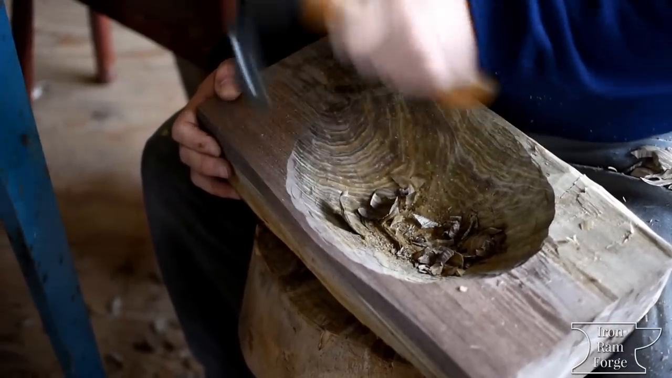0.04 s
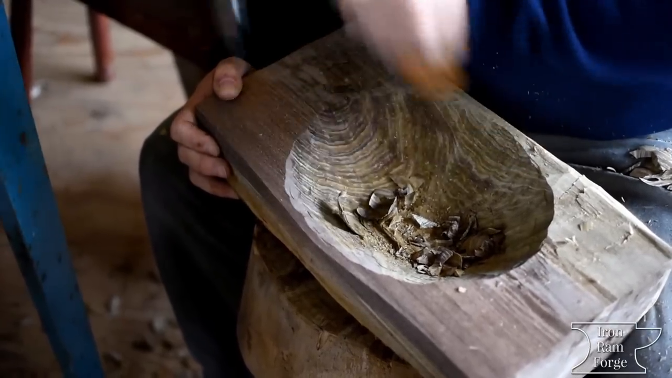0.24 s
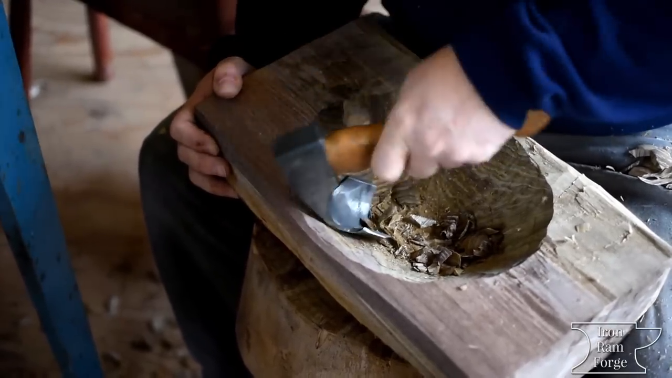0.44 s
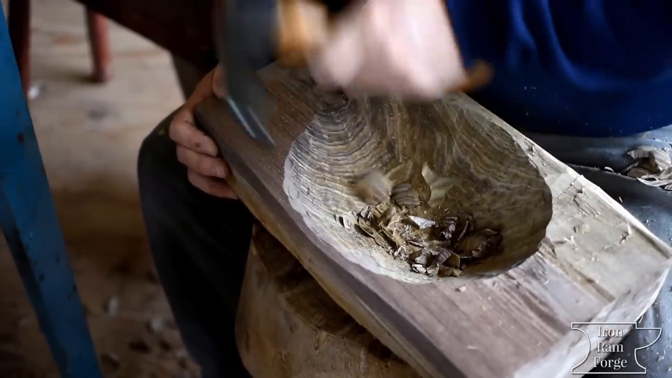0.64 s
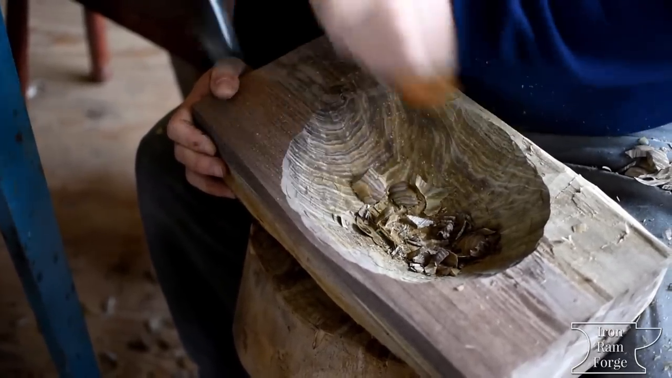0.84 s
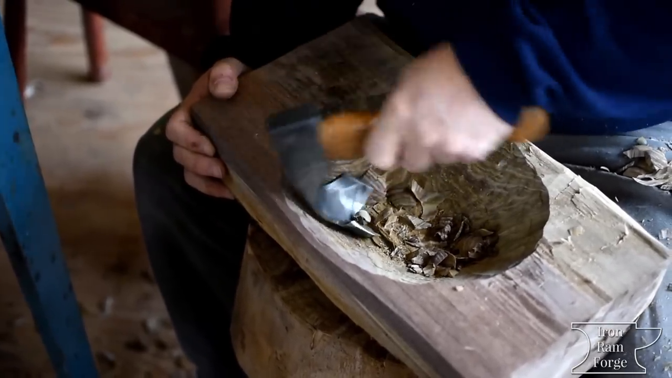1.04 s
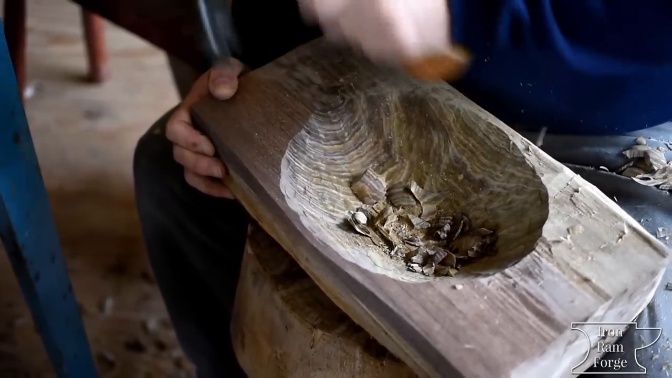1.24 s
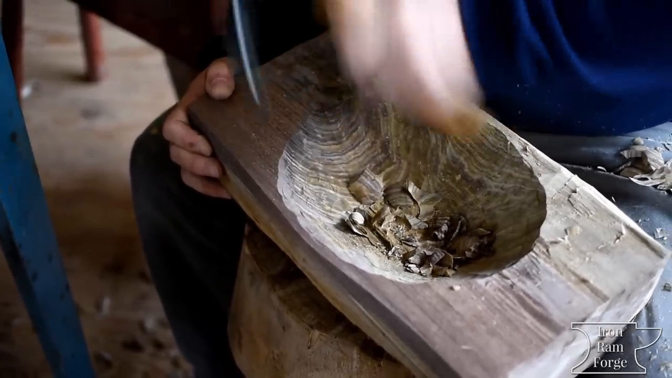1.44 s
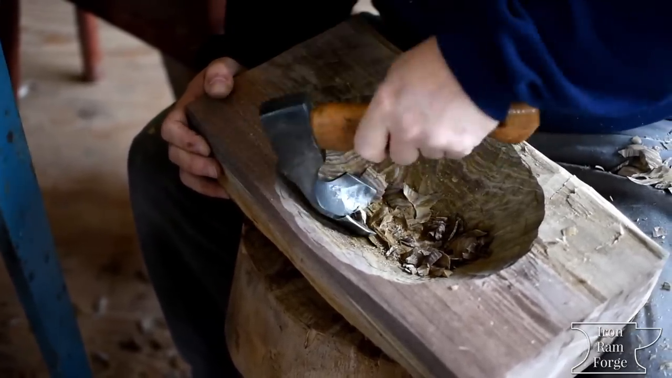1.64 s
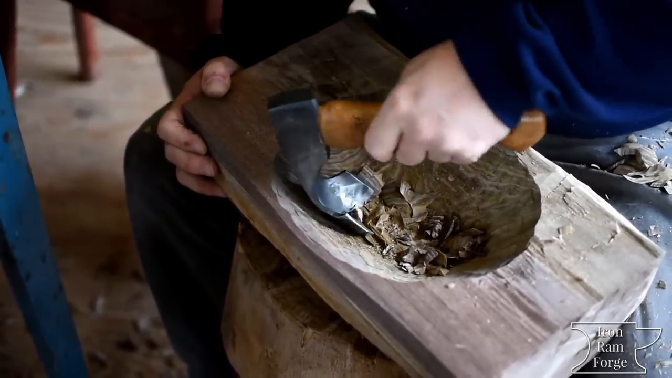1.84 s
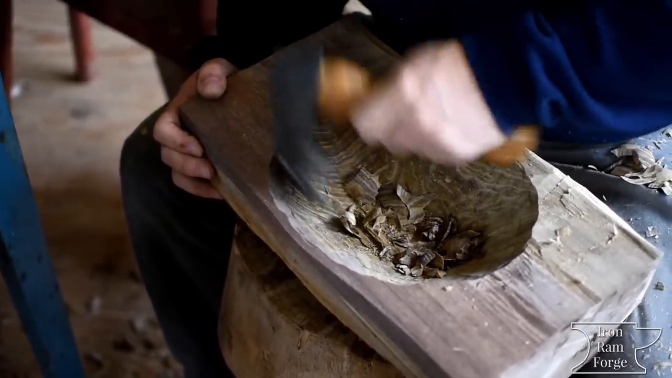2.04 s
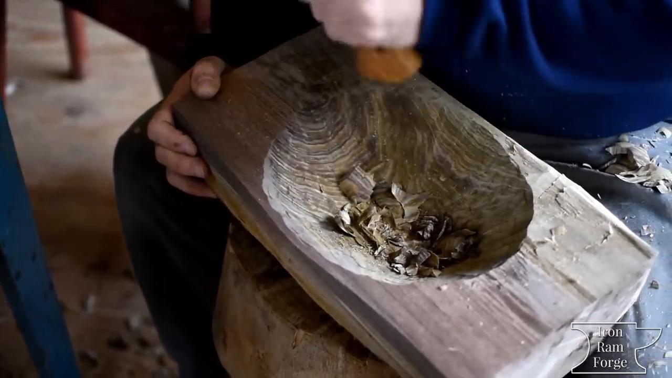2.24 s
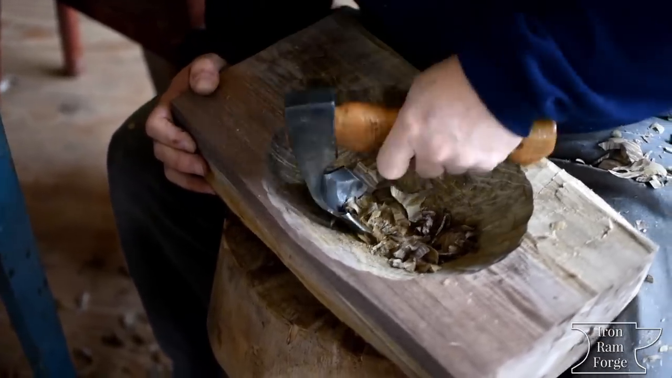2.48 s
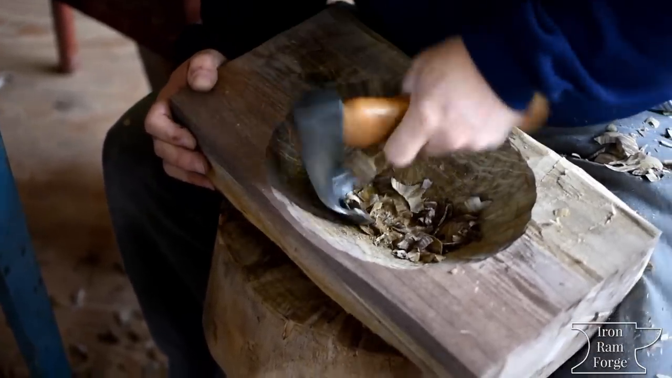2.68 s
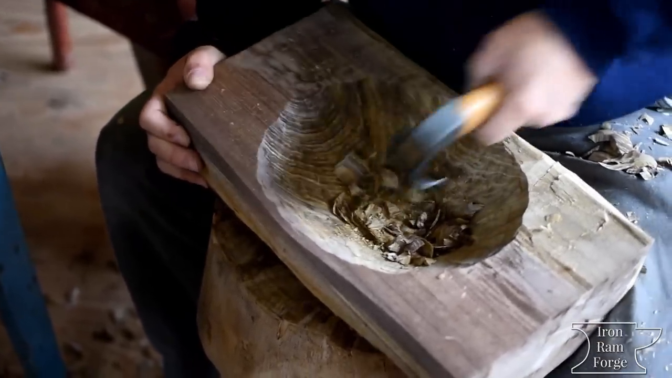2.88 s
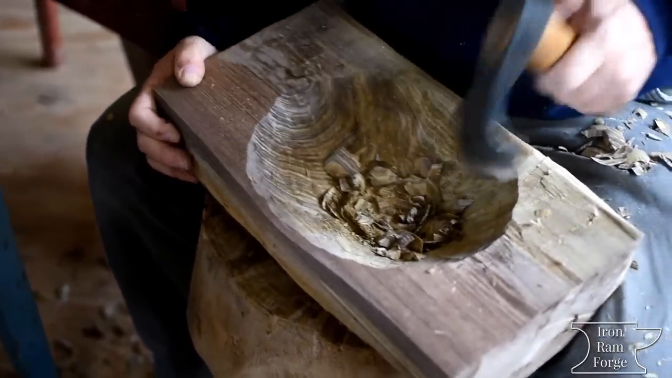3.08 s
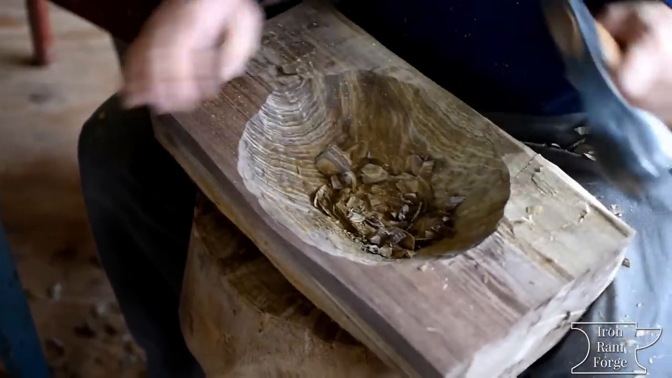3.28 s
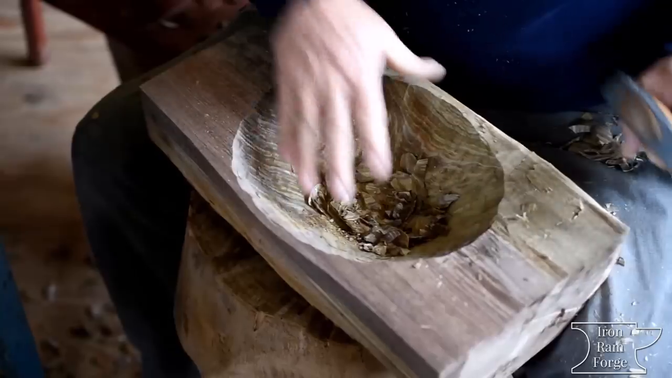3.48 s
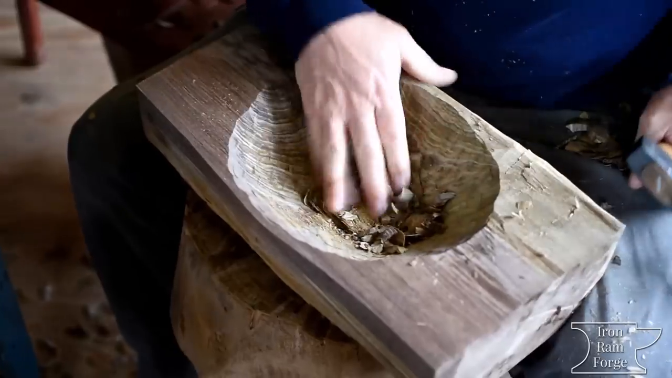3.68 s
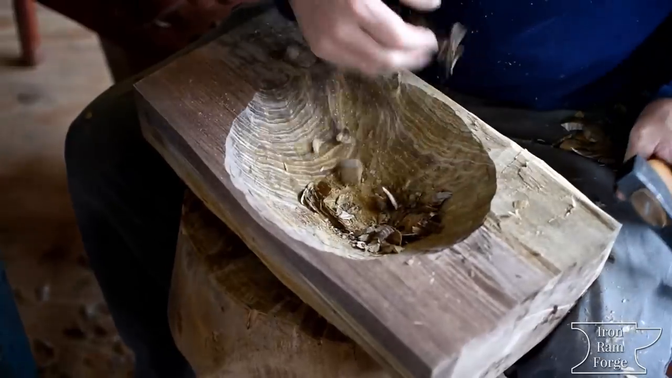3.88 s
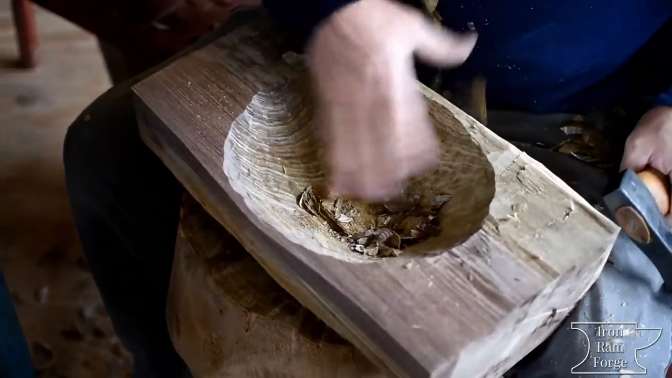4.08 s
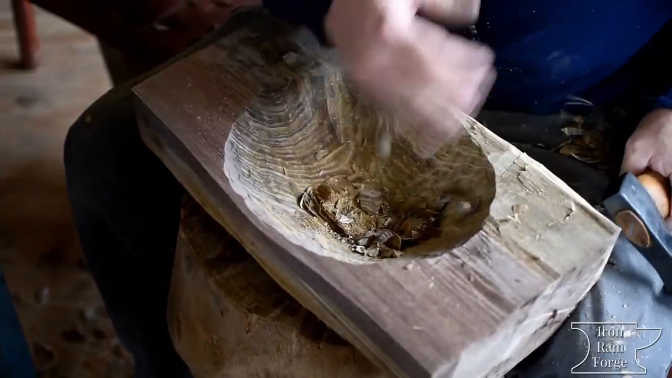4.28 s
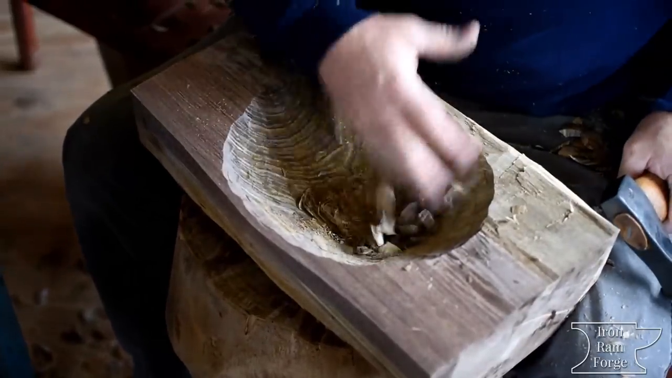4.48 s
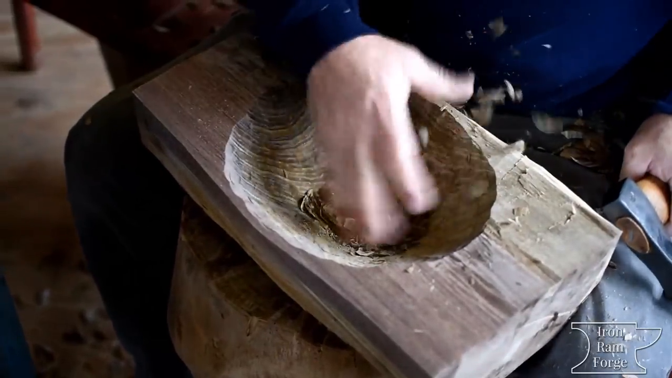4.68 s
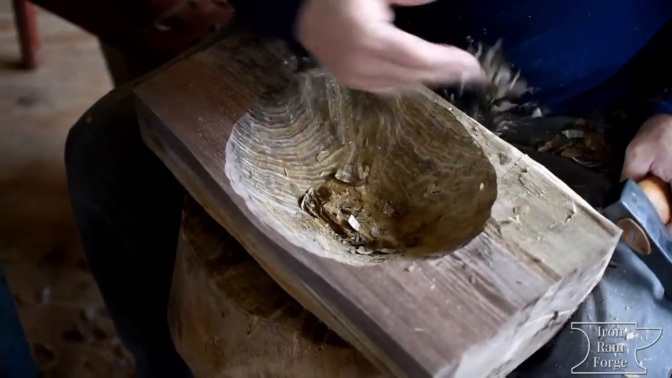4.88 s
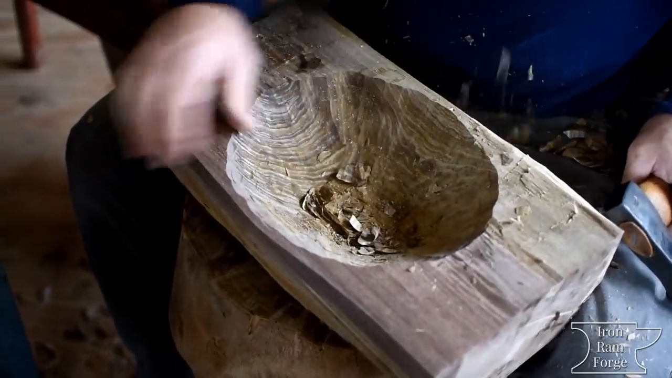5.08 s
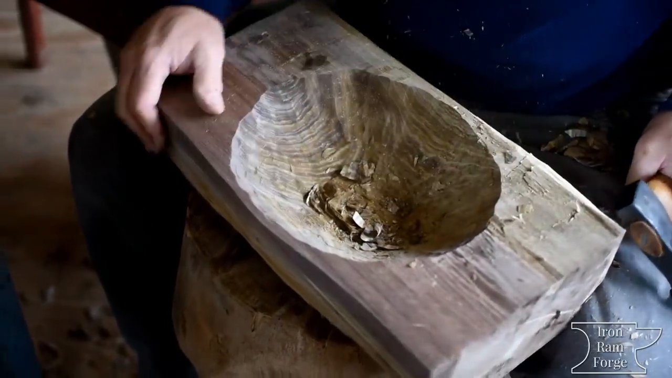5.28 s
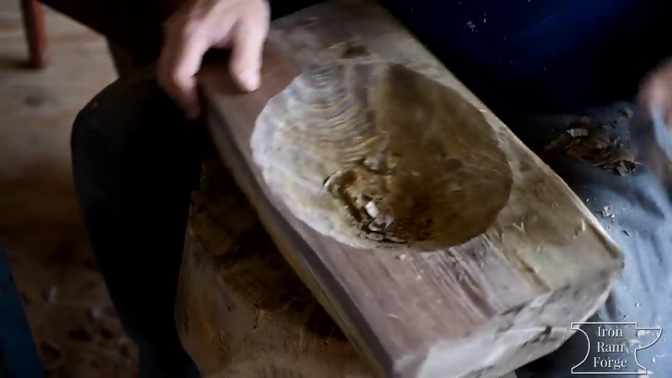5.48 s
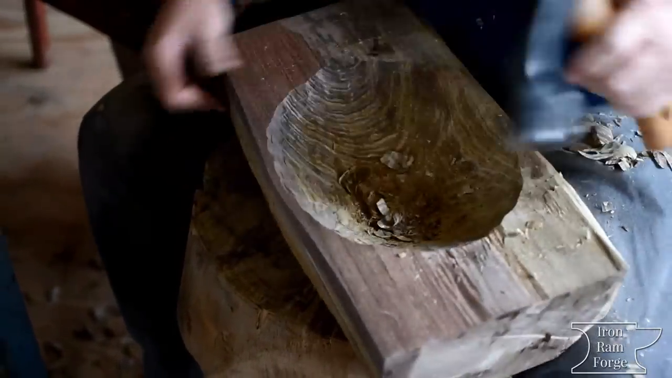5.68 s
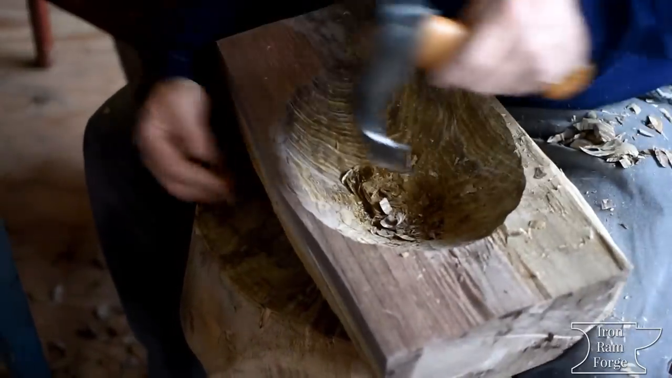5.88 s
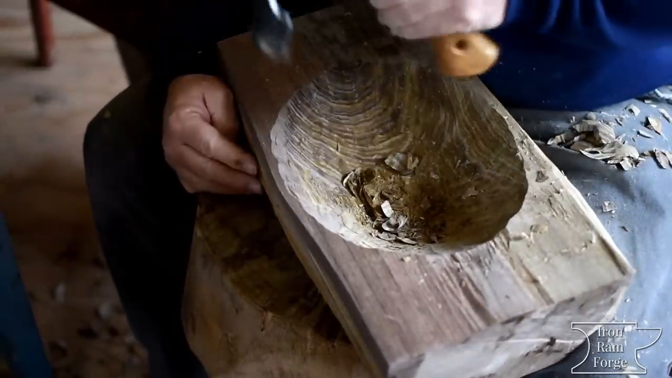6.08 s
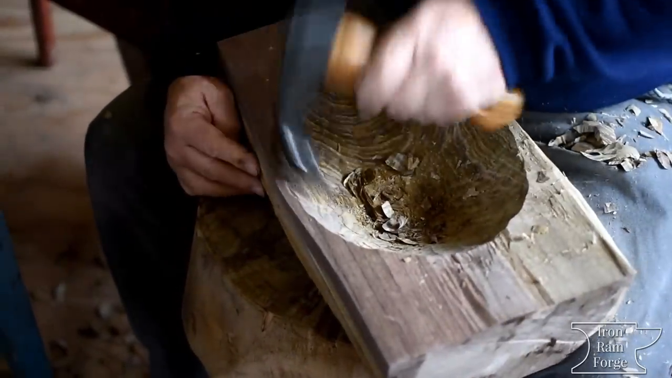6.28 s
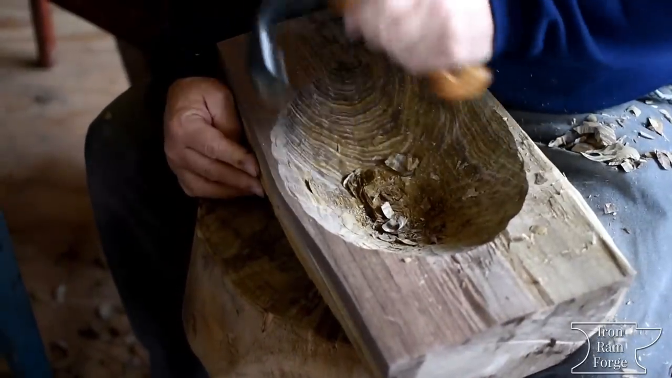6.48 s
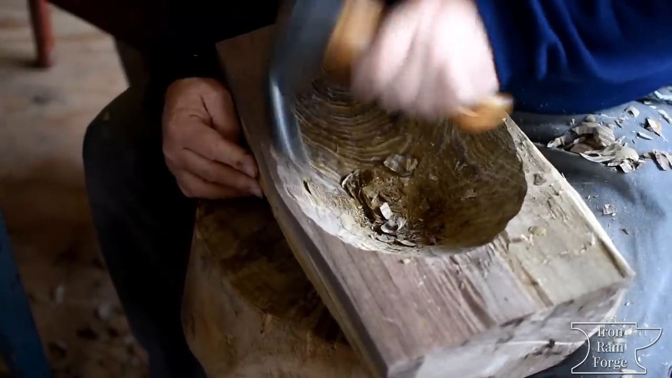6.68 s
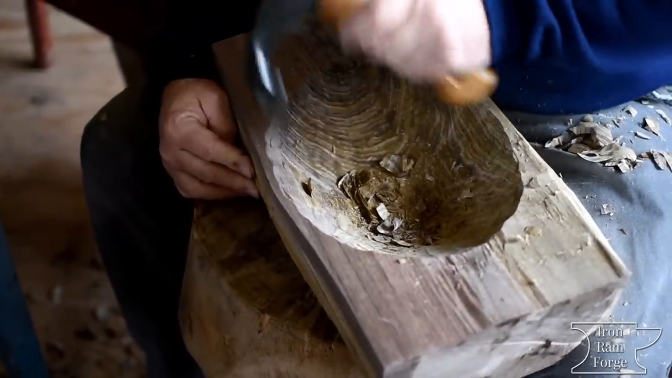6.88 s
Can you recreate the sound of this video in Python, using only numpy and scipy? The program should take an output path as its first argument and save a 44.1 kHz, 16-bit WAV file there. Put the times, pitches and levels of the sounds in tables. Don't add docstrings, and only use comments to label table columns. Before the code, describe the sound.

Close in a workshop, an adze strikes a damp wooden bowl blank four times, each blow a hard hollow knock with tearing fibres and a brief steely ring. A chip is levered out with sharp snaps, a hand brushes loose chips away, the block is dragged round on cloth with small bumps, then two lighter chops land. Low distant rumble lies underneath.

```python
import sys
import numpy as np
from scipy import signal
from scipy.fft import rfft, irfft, next_fast_len
from scipy.io import wavfile
from scipy.ndimage import uniform_filter1d

SR = 44100
rng = np.random.default_rng(int(sys.argv[2]) if len(sys.argv) > 2 else 0)


def volts(x):
    e = np.asarray(x, float) / 20
    return 10 ** e


def waveform_to_disk(signal):
    frames = np.transpose(np.atleast_2d(signal))
    scaled = np.clip(frames, -1, 1) * 32767
    samples = np.round(scaled).astype(np.int16)
    wavfile.write(sys.argv[1], SR, samples)


N = 305613
LEAD = SR // 2
M = N + LEAD

# (frequency [Hz], t60 [s], level for each of the six blows [dB] x 6, level when rubbed [dB])
LOWER = [(63.5, 0.6, -12, -9.5, -33, -21, -4.5, -1, 4), (106, 0.088, -43, -9, -2, -24, -31, -30, 7.5),
         (153.6, 0.07, 6.5, -1.5, -23, -8.5, 5, 9, 6), (172.5, 0.026, 4, -2, 3, -18, 1, 11, -25),
         (239.8, 0.087, -3, 3, -7.5, 0, -3, -1.5, 1), (295, 0.07, -7.5, -11, -9.5, -3.5, -5, -10, -11),
         (408, 0.025, -7.5, -26, -6, -29, -9, -2, -13)]
WALLS = [(419, 0.021, 3, 5, -10, 2, -2, 5.5, -23), (538, 0.036, 8, 0.5, 8.5, -23, -12, 2, -4),
         (584, 0.014, 11, 8, 12, 10, 6.5, 3, 0), (652, 0.032, -8.5, -26, -7.5, 7, 1.5, 2.5, -30),
         (687, 0.019, -28.5, -7.5, -8.5, 6, 2.5, -2, -28),
         (849, 0.038, -3.5, -3.5, -16.5, 4, -1, -1, -15.5), (915, 0.16, 3, -9.5, 3.5, 5, -32, -21.5, -22),
         (926.5, 0.12, -2, 6, 2, -18, -21, -25, -1), (975.3, 0.11, -14.5, 10.5, -1, -8, 9, -2, -13),
         (958, 0.031, 9, -20, 7.5, 6, 10, 1.5, -5), (1200, 0.00616, -23.5, -12, -24, 9, -21, 5, -38.5),
         (1500, 0.011, 5.5, 3.5, 9, 11.5, -14, -3, -15), (1448, 0.029, -1, -1.5, 7.5, 10.5, -20, -2.5, 1.5),
         (1601, 0.047, -15, -3, -40, -39.5, 1.5, 0.5, 6.5)]
HEAD = [(1910, 0.025, -35, -24, -9, -7.5, -26, -11, -38), (2070, 0.03, -3, -25, -8, -5, -0.5, -2.5, -2.5),
        (2203, 0.024, -30, -32, -22, -7.5, -5, -7, -29), (2440, 0.03, -22, -10, -21, -10, -25, -29, -39),
        (2680, 0.016, -25, -14, -22, -4, -5.5, -8, -41), (2980, 0.091, -44, -20, -23, -24, -7.5, -4.5, -13),
        (3125, 0.023, -11, -35, -14, -19, -26, -10, -15),
        (3150, 0.045, -37.5, -18, -31, -19, -28, -34, -40.5),
        (3580, 0.037, -11, -34, -43, -35, -14, -7, -27.5), (4570, 0.013, -41, -32.5, -21, -11, -8, -4, -31),
        (4755, 0.09, -11, -20, -37, -22.5, -28, -5.5, -38),
        (4763, 0.13, -28, -12, -20, -39, -19.5, -45, -43.5),
        (7090, 0.035, -28, -29.5, -16, -32.5, -15, -32, -44),
        (10120, 0.1, -25.5, -36, -36, -36, -9, -0.5, -40.5)]
UPPER = [(hz, min(t60, 0.08), *db) for hz, t60, *db in WALLS]
UPPER += [(hz, min(t60, 0.055), *db) for hz, t60, *db in HEAD]
RUBBED = 8


def at_hz(points, hz):
    points = np.array(points)
    return np.interp(np.log(hz + 1), np.log(points[:, 0]), points[:, 1])


def colour(x, spectrum):
    size = next_fast_len(len(x))
    gain = volts(at_hz(spectrum, np.fft.rfftfreq(size, 1 / SR)))
    y = irfft(rfft(x, size) * gain, size)[:len(x)]
    return y / np.sqrt(np.mean(y ** 2))


def butter(x, hz, kind, order=2):
    sos = signal.butter(order, np.clip(hz, 10, .45 * SR), kind, fs=SR, output="sos")
    return signal.sosfilt(sos, x)


def drift(rate_hz):
    slow = butter(rng.standard_normal(M // 50 + 2), rate_hz * 50, "low")
    return np.interp(np.arange(M) / 50, np.arange(len(slow)), slow / slow.std())


def rocking():
    # (time [s], frequency [Hz], level [dB], half width [s])
    rocks = [(0.014, 190, -31, 0.017), (0.0205, 65, -28, 0.046), (4.132, 620, -37, .002),
             (2.92, 557, -35.5, 0.0084), (2.469, 118, -23, 0.0075), (2.751, 148, -21, 0.026),
             (2.77, 130, -18, 0.012), (4.209, 480, -26.5, 0.0011)]
    t = (np.arange(M) - LEAD) / SR
    out = np.zeros(M)
    for s, hz, db, half_s in rocks:
        swell = np.exp(-np.abs(t - s) / half_s)
        out += np.sqrt(2) * volts(db) * swell * np.sin(2 * np.pi * hz * (t - s))
    return out


def drone(rows, waver_db):
    t, out = (np.arange(M) - LEAD) / SR, 0
    for s, length_s, hz, level_db, fade_db in rows:
        outside_s = np.maximum(s - t, 0) + np.maximum(t - s - length_s, 0)
        gain = volts(level_db - fade_db * np.maximum(t - s, 0) - 470 * outside_s)
        out = out + gain * np.sin(2 * np.pi * hz * t)
    return np.sqrt(2) * volts(waver_db * drift(25.9)) * out


def background():
    # (time [s], level [dB])
    rumble_levels = [(0.0, -43), (2.2, -43.5), (3.3, -45), (4.6, -48.5), (5.3, -47.5), (6.93, -46)]
    # (frequency [Hz], density [dB per Hz])
    rumble_colour = [(12, -18.5), (20, -4.5), (81, -2.5), (120, -3), (226, -12), (289, -9), (342, -35),
                     (387, -15), (425, -24), (503, -25), (800, -28), (1040, -39.5), (1760, -120)]
    # (time of the jolt [s], peak [dB])
    shudders = [(-.12, -42.5), (.357, -36), (.96, -36.5), (1.533, -48), (2.447, -33), (2.62, -30.5),
                (4.08, -55), (6.338, -58), (6.747, -26)]
    # (time [s], length [s], frequency [Hz], level [dB], fade [dB per s])
    low_drones = [
        (1.72, 0.82, 119, -37, 26.5),
        (2.84, 1.56, 119.7, -38.5, 12.5),
    ]
    high_drones = [
        (5.15, 0.32, 275, -54.5, 27),
        (5.59, 0.69, 288.6, -47, 14),
    ]
    # (frequency [Hz], density [dB per Hz])
    hiss_colour = [(180, -13), (300, 7), (440, -6.5), (946, -10.5), (1060, -10), (3030, -13),
                   (11100, -22.5), (13100, -28), (14200, -29.5), (16000, -66.5)]
    # (frequency [Hz], side re mid [dB])
    hiss_side = [(60, -62), (110, -71.5), (200, -58), (380, -38.5), (700, -23.5), (1290, -14),
                 (2380, -11.5), (4400, -19), (8120, -18), (15000, -7.5)]
    hiss_db, shudder_s = -53.5, 0.06
    t = (np.arange(M) - LEAD) / SR
    gain = volts(np.interp(t, *np.transpose(rumble_levels)))
    for s, peak_db in shudders:
        late = np.maximum(t - s, 0) / shudder_s
        gain += volts(peak_db) * (late / 2) ** 2 * np.exp(2 - late)
    rumble = colour(rng.standard_normal(M), rumble_colour + [(1600, -83.0)])
    rumble = gain * volts(2.83 * drift(9.6)) * rumble
    mid_hiss = volts(hiss_db) * colour(rng.standard_normal(M), [(150, -26.0)] + hiss_colour)
    side_colour = [(hz, db + at_hz(hiss_side, hz)) for hz, db in hiss_colour]
    side_hiss = volts(hiss_db - 5.5) * colour(rng.standard_normal(M), [(150, -90.0)] + side_colour)
    engines = drone(low_drones, waver_db=3.0) + drone(high_drones, waver_db=1.5)
    return np.array([mid_hiss + rumble + rocking() + engines, side_hiss])


def workshop(x):
    # (frequency [Hz], t60 [s], level [dB], side re mid [dB])
    room = [(56.7, 0.7, -4.5, -77), (119, 0.58, 0.5, -61), (262, 0.42, -3.5, -59), (580, 0.41, -8, -97),
            (964, 0.4, -8.5, -41), (2300, 0.41, -9, -13), (3700, 0.36, -6, -13), (7360, 0.32, -13.5, -4.5),
            (14000, 0.14, -37.5, 24.5)]
    even_hz = 30
    t = np.arange(SR) / SR
    white, tails = rng.standard_normal((2, 2, SR)), 0
    gap = np.clip((t - .003) / 0.0096, 0, 1)
    for k, (hz, t60, level_db, side_db) in enumerate(room):
        lines = rfft(white[k % 2] * volts(-60 * t / t60) * gap)
        local_power = uniform_filter1d(np.abs(lines) ** 2, even_hz)
        even = irfft(lines / np.sqrt(local_power), SR) * np.sqrt(SR)
        octave = [hz / np.sqrt(2), hz * np.sqrt(2)]
        band = butter(even * (gap > 0) * (t < .8), octave, "band") / np.sqrt(SR)
        tails = tails + band * volts([[level_db], [level_db + side_db]])
    size = next_fast_len(M + SR)
    return irfft(rfft(x, size) * rfft(tails, size), size)[:, :M]


def flutter():
    # (time of the blow [s], frequency [Hz], level [dB])
    returns = [
        (.3567, 925, -22.5),
        (.96, 960, -21.5),
        (1.5325, 950, -24),
        (2.4472, 923, -28.5),
    ]
    delay_s, hold_s, fade_s = .133, .025, 0.013
    out, t = np.zeros(M), np.arange(SR // 4) / SR
    shape = (1 - np.exp(-t / 0.0025)) * np.exp(-np.maximum(t - hold_s, 0) / fade_s)
    for s, hz, db in returns:
        i = round((s + delay_s) * SR) + LEAD
        out[i:i + len(t)] += volts(db) * shape * np.sin(2 * np.pi * hz * t)
    return out


def singing():
    # (time [s], frequency [Hz], rms level [dB], t60 [s])
    linger = [(.385, 4730, -32, .45), (.97, 4820, -40, .4), (1.55, 3130, -35, 0.39),
              (1.56, 4900, -48, 0.36), (2.46, 2730, -30, .45), (2.9, 4570, -48, 0.32),
              (2.884, 2170, -28, 0.11), (3.553, 3060, -46, 0.15), (3.553, 3700, -54, .12)]
    width_hz = 90
    out, t = np.zeros(M + SR), np.arange(SR // 2) / SR
    for s, hz, db, t60 in linger:
        white = rng.standard_normal(len(t))
        line = butter(white, [hz - width_hz / 2, hz + width_hz / 2], "band")
        i = round(s * SR) + LEAD
        out[i:i + len(t)] += volts(db - 60 * t / t60) * line / line.std()
    return out[:M]


def ring(force, hz, t60):
    r, w = volts(-60 / (t60 * SR)), 2 * np.pi * hz / SR
    return signal.lfilter([0, np.sin(w)], [1, -2 * r * np.cos(w), r * r], force + 1e-18)


def sound_of(modes, column, force):
    return sum((-1) ** k * volts(m[column]) * ring(force, m[0], m[1]) for k, m in enumerate(modes))


def block(upper_force, low_force, column):
    out, driven = np.zeros(len(upper_force)), np.flatnonzero(upper_force)
    span = slice(driven[0], driven[-1] + SR // 2)
    out[span] = sound_of(UPPER, column, upper_force[span]) + sound_of(LOWER, column, low_force[span])
    return out


def through_block(ringing, thud):
    # (time [s], place [0 floor of the hollow to 1 rim])
    touch_place = [(0.0, 0.15), (2.75, 0.091), (2.95, 0.17), (3.3, 0.08), (3.62, 0.083), (3.72, 0.71),
                   (3.84, 0.51), (3.87, 0.74), (4.13, 0.37), (4.3, 0.37), (4.48, 0.46), (4.53, 0.74),
                   (4.56, 0.093), (4.75, .9), (4.78, 0.36), (4.85, .6), (5.2, 0.44), (6.93, .5)]
    # (frequency [Hz], level re floor [dB])
    rim_tilt = [(500, 2), (940, -5.5), (1300, 0), (1450, 9), (1600, -1), (2060, 0), (3000, -9), (5000, -4)]
    click = np.eye(1, SR // 2)[0]
    upper_gain = np.sqrt(np.sum(sound_of(UPPER, RUBBED, click) ** 2))
    low_gain = np.sqrt(np.sum(sound_of(LOWER, RUBBED, click) ** 2))
    t = (np.arange(M) - LEAD) / SR
    share = np.clip(np.interp(t, *np.transpose(touch_place)), 0, 1)
    rim_modes = [(m[0], m[1], m[RUBBED] + at_hz(rim_tilt, m[0])) for m in UPPER]
    rim = sound_of(rim_modes, column=2, force=share * ringing / upper_gain)
    return rim + block((1 - share) * ringing / upper_gain, thud / low_gain, column=RUBBED)


def grit(per_s, spread_db, smooth):
    slips = (rng.random(M) < per_s / SR) * volts(spread_db * np.minimum(rng.exponential(1, M), 4))
    slips = slips * rng.choice([-1, 1], M)
    force = slips / slips.std() + smooth * rng.standard_normal(M)
    return force / force.std()


def strokes(rows, lift_db_per_s):
    touch_s, lands_db = 0.00485, -10
    settle_db, ring_settle_db, settle_db_per_s = -37.5, -47.5, 97
    first, second = np.zeros((2, M + SR))
    t = np.arange(SR) / SR - touch_s
    for s, swell_s, hold_s, level_db, second_db in rows:
        swell_s = max(swell_s, 1e-3)
        after = np.maximum(t - swell_s - hold_s, 0)
        rise = volts(np.interp(t, [-touch_s, 0, swell_s], [lands_db - 11.0, lands_db, 0]))
        lift = volts(level_db) * rise * volts(-lift_db_per_s * after)
        settle = volts(level_db) * rise * volts(-settle_db_per_s * after)
        i = round((s - touch_s) * SR) + LEAD
        first[i:i + SR] += (lift + volts(settle_db) * settle)[:M + SR - i]
        second[i:i + SR] += volts(second_db) * (lift + volts(ring_settle_db) * settle)[:M + SR - i]
    return first[:M], second[:M]


def dragging():
    # (time [s], swell [s], hold [s], level [dB], thud re level [dB])
    moves = [
        (4.797, 0.0022, 0.027, -34.5, -29),
        (4.992, 0.0016, .003, -43.5, -36),
        (5.068, 0.0016, 0.021, -46.5, -27),
        (5.137, 0.0022, 0.031, -47, -26),
        (5.28, 0.21, 0.11, -37, 5.5),
        (5.72, 0.14, 0.25, -58.5, -1),
    ]
    # (frequency [Hz], density [dB per Hz])
    cloth_colour = [(180, -25), (300, -12), (600, -2.5), (800, -9), (950, -1), (1100, -14), (1500, -11),
                    (1750, -12.5), (2000, -13), (4230, -23.5), (14200, -36.5), (16000, -69)]
    drag, heave = strokes(moves, lift_db_per_s=348)
    judder = grit(3000, 2.5, 1.0) * volts(1.5 * drift(30))
    air = drag * volts(0.5) * colour(judder, cloth_colour)
    return air, drag * volts(-12.5) * judder, heave * judder


def scraping():
    # (time [s], swell [s], hold [s], hiss [dB], ring of the block re hiss [dB])
    blade_strokes = [(.84, 0.0052, 0.027, -52.5, 9), (.901, 0.0022, 0.021, -39, 12.5),
                     (1.91, 0.012, 0.029, -62.5, 13), (2.027, 0.0094, 0.006, -42.5, -10),
                     (2.695, 0.0024, 0.021, -43.5, 17), (2.735, .004, 0.015, -52, 14),
                     (2.765, 0.015, 0.06, -31, -5), (2.882, 0.0011, 0.0017, -23, 6),
                     (3.135, 0.0099, 0.016, -48.5, 3), (3.185, 0.01, 0.044, -60, 17.5),
                     (3.23, 0.016, 0.024, -50.5, 9.5), (3.33, .05, .1, -63, -4)]
    hand_strokes = [(3.55, 0.0065, 0.054, -48, 10.5), (3.64, 0.0085, 0.066, -45, -1),
                    (3.708, 0.017, 0.15, -35.5, 3.5), (3.853, 0.014, 0.0099, -52.5, 21.5),
                    (4.1, 0.018, .005, -40, -10), (4.128, 0.02, 0.053, -38.5, 13),
                    (4.33, 0.008, 0.0091, -55, 6), (4.398, .005, 0.024, -65.5, 20.5),
                    (4.463, 0.0046, 0.0046, -35.5, -10), (4.49, 0.012, 0.032, -33, -0.5),
                    (4.55, 0.0061, 0.0084, -47, 14), (4.61, 0.004, 0.011, -59.5, 21.5),
                    (4.69, 0.0082, 0.037, -57.5, 10), (4.74, 0.03, 0.04, -33, 2.5),
                    (4.83, 0.0071, 0.014, -47.5, 12), (5.02, .13, .005, -51, -16),
                    (5.19, 0.041, 0.068, -58.5, 13.5), (5.67, 0.031, 0.17, -58.5, 7.5),
                    (5.91, 0.0086, 0.0045, -51.5, -2), (6.0, 0.028, 0.0052, -52.5, -9)]
    scatter = [(.39, 0.0053, .005, -32, 0), (.99, 0.008, .005, -36, 8), (1.56, .01, .005, -69, -9),
               (2.48, .01, .005, -69, 1), (6.37, 0.0091, .005, -52, -17), (6.78, 0.0071, .005, -45.5, 1)]
    # (frequency [Hz], density [dB per Hz])
    rub_colour = [(590, -34), (1000, -9), (1540, 0), (2870, -3.5), (7620, -3.5), (13900, -9), (15300, -16),
                  (16000, -96)]
    force = grit(3500, 3.3, 0.9) * volts(1.8 * drift(45))
    blade, blade_ring = strokes(blade_strokes, lift_db_per_s=363)
    hand, hand_ring = strokes(hand_strokes, lift_db_per_s=322)
    chips, chips_ring = strokes(scatter, lift_db_per_s=104.5)
    air = (blade + hand + chips) * colour(force, rub_colour)
    ringing = volts(-8.5) * (blade_ring + hand_ring + chips_ring) * force * volts(0.93 * drift(4.3))
    thud = (volts(-6) * blade + volts(-19.5) * (hand + chips)) * force
    return air, ringing, thud


def snaps_and_knocks():
    # (time [s], peak [dB], centre [Hz])
    snaps = [(.3665, -5, 7600), (0.373, -6.5, 9000), (.381, -0.5, 8000), (.6599, -39, 4636),
             (0.9032, -23, 3800), (0.915, -25, 4100), (1.546, -26, 5950), (1.554, -27, 8000),
             (1.919, -31, 2630), (1.947, -34, 2560), (2.021, -32, 6540), (2.4535, -9, 6000),
             (2.791, -6, 9500), (2.801, -13, 7800), (2.8045, -13, 10500), (2.8165, -21, 8000),
             (2.83, -25, 6000), (2.8405, -19, 9000), (2.8831, -2, 7940), (2.8841, -7.5, 10100),
             (2.894, -11.5, 8000), (3.139, -40, 4000), (3.16, -27, 9100), (3.602, -30, 9500),
             (3.653, -25, 9000), (3.701, -23, 10500), (3.7148, -13, 8550), (3.898, -21, 8000),
             (4.026, -36, 6000), (4.1325, -14, 10250), (4.3289, -34, 5100), (4.3379, -44, 7600),
             (4.4685, -14, 6400), (4.481, -17, 6050), (4.4953, -18, 7360), (4.755, -20, 10000),
             (4.7637, -20, 5850), (4.624, -38, 9000), (4.724, -43, 8500), (4.745, -26, 7300),
             (5.091, -27.5, 7570), (5.865, -34, 5470), (5.916, -34.5, 5800), (6.027, -38, 4180)]
    # (time [s], knock [dB], click re knock [dB], ring of the block re knock [dB])
    knocks = [(0.695, -31, -22, 3), (0.8411, -30, -11, 6), (2.7006, -20, -32, 11), (2.7382, -25, -25, 18.5),
              (2.8851, -27, -2, 10), (3.169, -33.5, -6, 1), (3.557, -40, -16, 21), (4.103, -35.5, -5, 13),
              (5.069, -32, 0.5, -4), (4.132, -34, -6, -1), (4.402, -33, -10, -4), (4.81, -22, -12, 3),
              (4.9933, -30.5, -10, -17), (5.137, -29, -5, -2), (5.2163, -32, -11, -4), (5.286, -34, -16, 2),
              (5.323, -29, -11, 0), (5.345, -31, -2, -2), (5.41, -28, -12, 6)]
    snap_knock_db, knock_click_hz = -21, 5100
    taps = [(s, db, hz, db + snap_knock_db, 6.0) for s, db, hz in snaps]
    taps += [(s, db + click_db, knock_click_hz, db, ring_db) for s, db, click_db, ring_db in knocks]
    air, ringing = np.zeros((2, M))
    t = np.arange(SR // 50) / SR
    for s, click_db, hz, knock_db, ring_db in taps:
        i = round(s * SR) + LEAD
        burst = rng.standard_normal(len(t)) * np.exp(-t / .0004)
        click = butter(burst, [hz / 1.6, hz * 1.5], "band")
        knock = butter(burst, [450, 2400], "band")
        air[i:i + len(t)] += volts(click_db) * click / np.abs(click).max()
        air[i:i + len(t)] += volts(knock_db) * knock / np.abs(knock).max()
        ringing[i] += volts(knock_db + ring_db)
    return air, ringing


def handling():
    drag_air, drag_ring, drag_thud = dragging()
    scrape_air, scrape_ring, scrape_thud = scraping()
    tap_air, tap_ring = snaps_and_knocks()
    wood = through_block(drag_ring + scrape_ring + tap_ring, drag_thud + scrape_thud)
    return drag_air + scrape_air + tap_air + wood


def blows(rows, spots, weight_db):
    # (frequency [Hz], density [dB per Hz])
    tear_colour = [(1470, -7), (2500, 0), (3330, -7), (4100, -12.5), (5500, -9), (13400, -13), (14900, -18),
                   (16000, -56)]
    # (frequency [Hz], density [dB per Hz])
    thud_colour = [(35, -34), (60, -17), (146, -6.5), (260, -2.5), (763, -15), (944, 12), (1100, -22.5),
                   (1440, -5), (1780, -26.5), (2120, -26), (6000, -37), (7800, -51.5), (13200, -120)]
    force, out, tear, jolt, shake = np.zeros((5, M))
    t = np.arange(SR // 4) / SR
    bite = round(.0006 * SR)
    for (s, force_db, cut_s, stop_db, tear_db), spot in zip(rows, spots):
        i = round(s * SR) + LEAD
        span = slice(i, min(i + len(t), M))
        now = t[:span.stop - i]
        after = np.maximum(now - cut_s, 0)
        judder = volts(-26.0) * rng.standard_normal(len(now))
        push = judder * np.exp(-after / 0.017) * (now > .001)
        push[0] -= volts(-33.0)
        push[bite] += 1
        push[round(cut_s * SR)] += volts(stop_db)
        push = volts(force_db) * push
        force[span] += push
        blow = np.pad(push, (0, SR // 4))[:M - i]
        edge = signal.convolve(blow, np.hanning(7) / 3, "same", "direct")
        weight = butter(blow, 187, "low", order=1) * volts(weight_db - 0.5)
        out[i:i + len(blow)] += block(edge, weight, spot)
        fibres = np.exp(-after / 0.016) + volts(-34.5) * np.exp(-after / 0.22)
        tear[span] += volts(tear_db) * np.minimum(now / cut_s + 0.37, 1) * fibres
        tear[span] += volts(tear_db + 3) * (after > 0) * np.exp(-after / 0.002)
        jolt[span] += volts(force_db) * np.minimum(now / 0.000086, 1) * np.exp(-after / 0.014)
        shake_db = force_db + weight_db - 5
        shake[span] += volts(shake_db) * np.minimum(now / 0.0017, 1) * np.exp(-now / 0.04)
    crack = volts(-2.5) * butter(force, [1800, 3600], "band", order=3)
    dense = colour(rng.standard_normal(M), thud_colour)
    thud = jolt * butter(dense, 663, "high") + shake * butter(dense, 677, "low")
    tearing = tear * colour(grit(3100, 2.7, 0.34), tear_colour)
    return volts(-7.5) * out + crack + thud + tearing


def scene():
    # (time of the bite [s], force [dB], time until the edge stops [s], stop [dB],
    # tearing [dB])
    earlier = [
        (-.3, -14, .01, -18, -30),
               (0.3568, -1.5, 0.009, -3.5, -14),
        (.9600, -2, 0.0091, -20, -22),
    ]
    low_wall = [
        (1.5325, -1, .0131, 1.5, -21.5),
        (2.4472, 0.2, 0.00654, -1.5, -18.5),
    ]
    far_wall = [
        (6.3382, -8.5, .0052, 0, -29.5),
        (6.7470, -6, .0135, -8, -24),
    ]
    work = blows(earlier, (2, 2, 3), weight_db=8.0)
    work += blows(low_wall, (4, 5), weight_db=4.0)
    work += blows(far_wall, (6, 7), weight_db=4.0)
    work += handling()
    near = butter(work, 107, "high")
    lean = volts(-24) * near + volts(-14) * np.gradient(near)
    lean = signal.filtfilt(*signal.butter(1, 800.0, "high", fs=SR), lean)
    direct = np.array([near + flutter(), lean])
    mid, side = (direct + workshop(near) + background())[:, LEAD:]
    mid = mid + singing()[LEAD:]
    return np.array([mid + side, mid - side])


def band_limit(x):
    return signal.sosfilt(signal.butter(12, 16150, fs=SR, output="sos"), x)


def record(dry):
    power = signal.lfilter([.01], [1, -.99], np.mean(dry ** 2, axis=0))
    level_db = 10 * np.log10(power + 1e-12)
    ramp_db = 40 * np.arange(N) / SR
    held_db = np.maximum.accumulate(np.maximum(level_db + 15, 0) + ramp_db) - ramp_db
    lag = np.exp(-1 / (0.002 * SR))
    duck_db = 0.47 * signal.lfilter([1 - lag], [1, -lag], held_db)
    clipped = np.clip(dry * volts(-duck_db), -1, 1)
    top = signal.cheby2(10, 60, 16500, fs=SR, output="sos")
    mix = np.clip(signal.sosfilt(top, clipped), -1, 1)
    return band_limit(mix)


dry = scene()
out = record(dry)
waveform_to_disk(out)
```